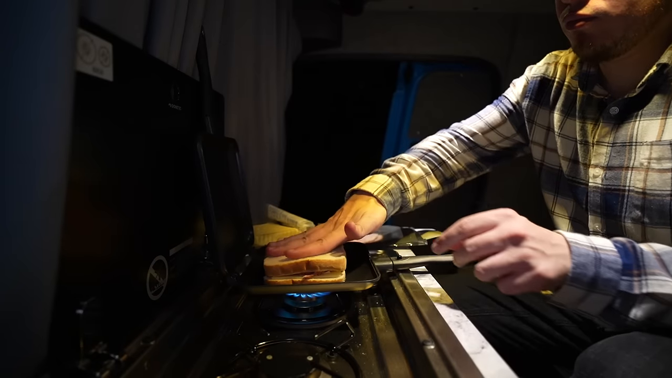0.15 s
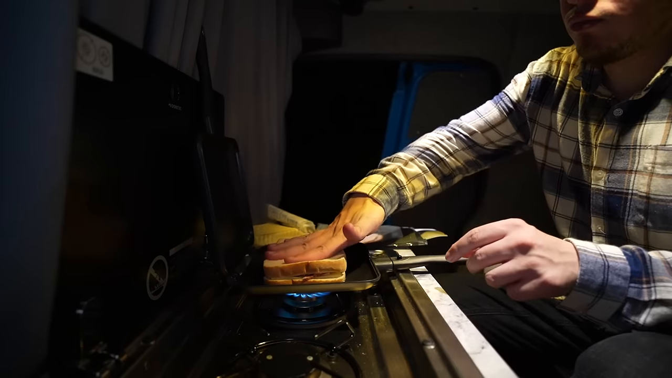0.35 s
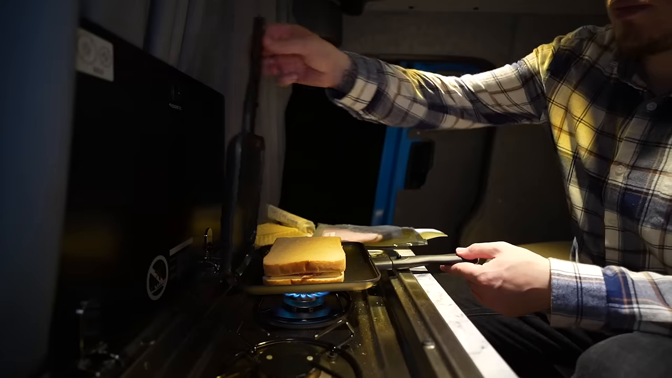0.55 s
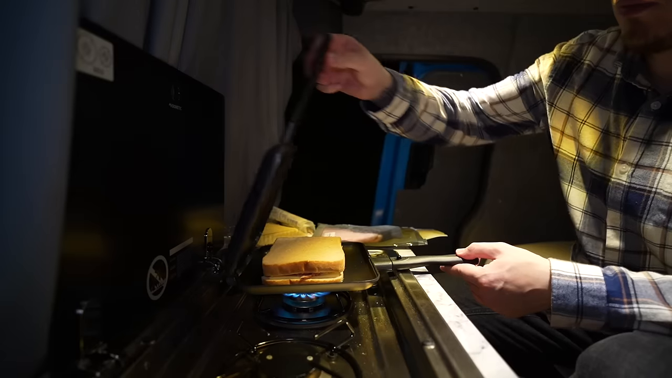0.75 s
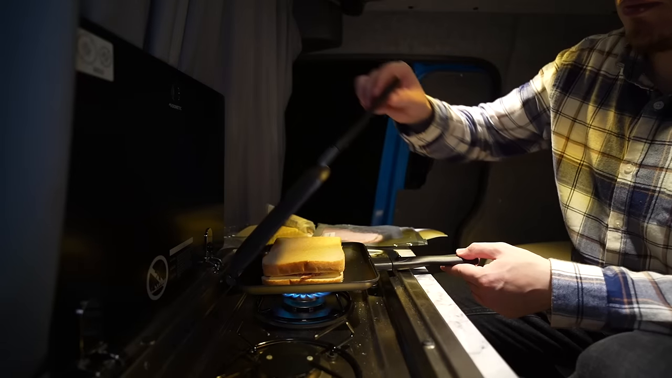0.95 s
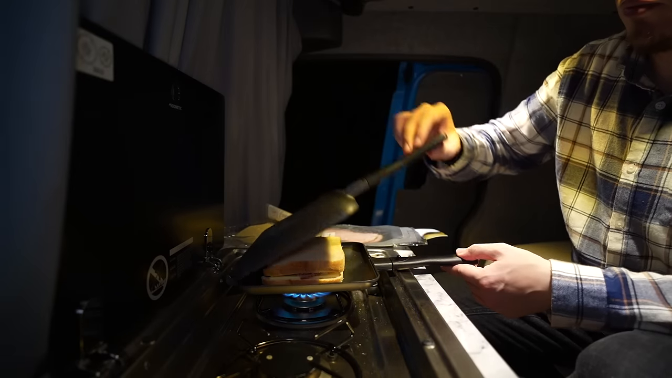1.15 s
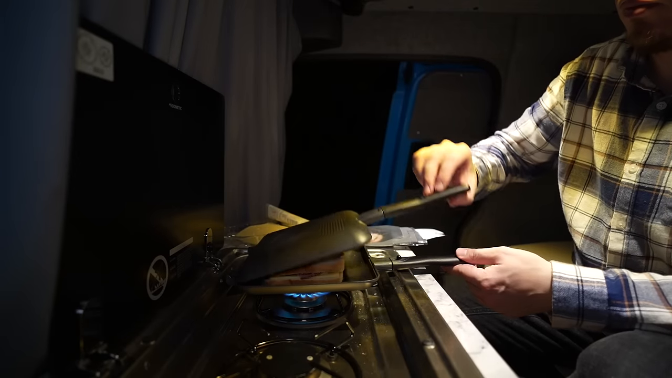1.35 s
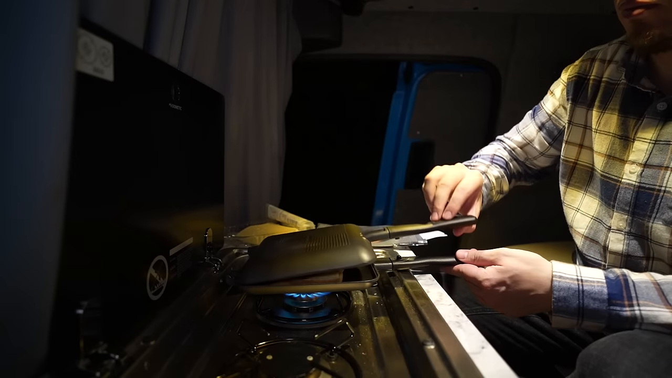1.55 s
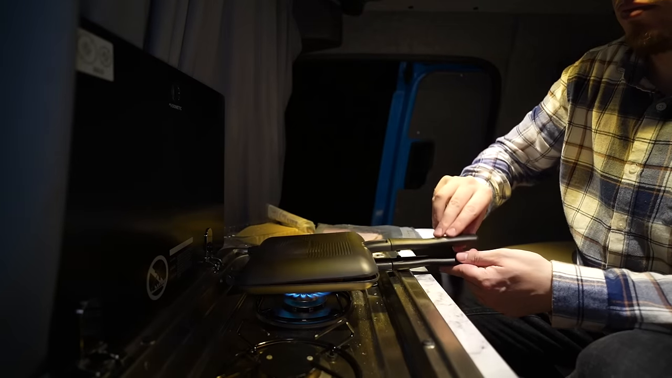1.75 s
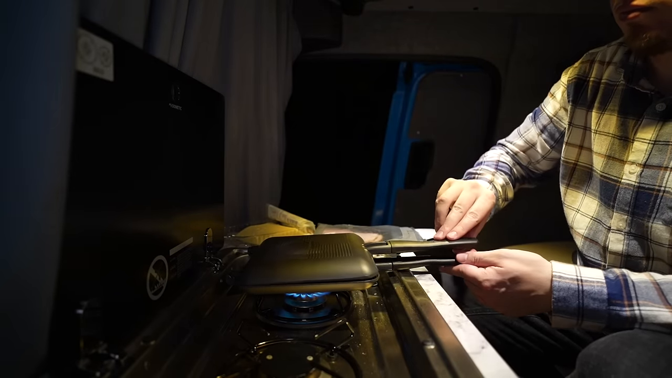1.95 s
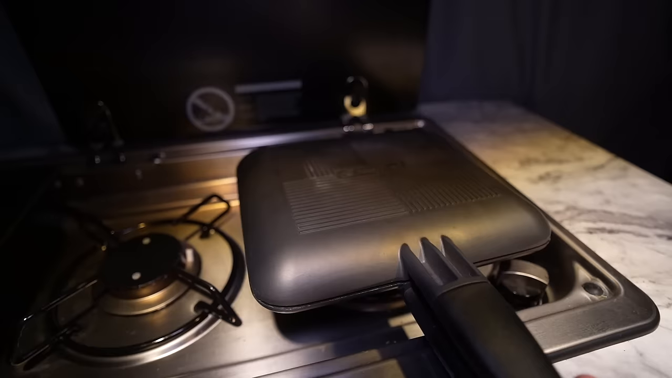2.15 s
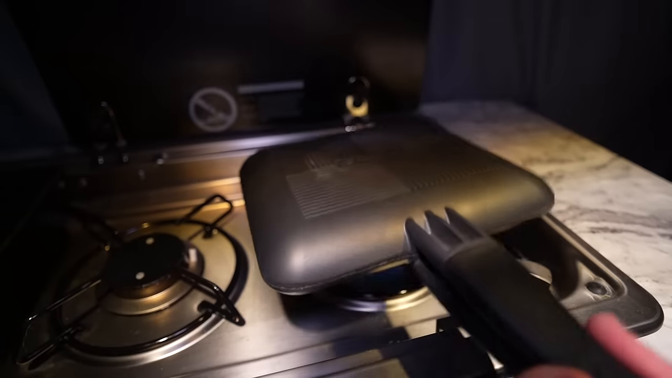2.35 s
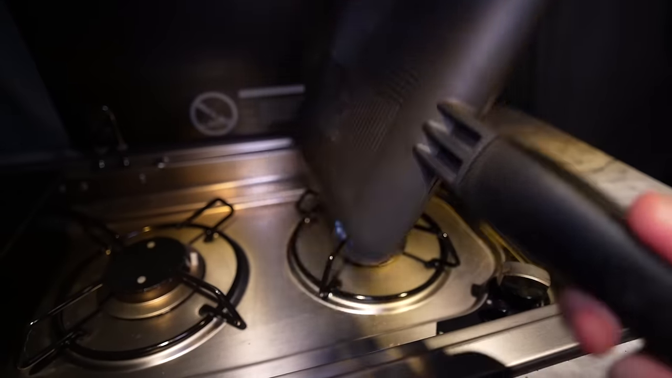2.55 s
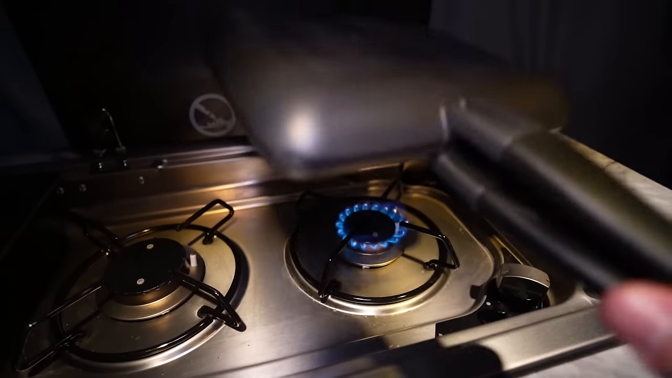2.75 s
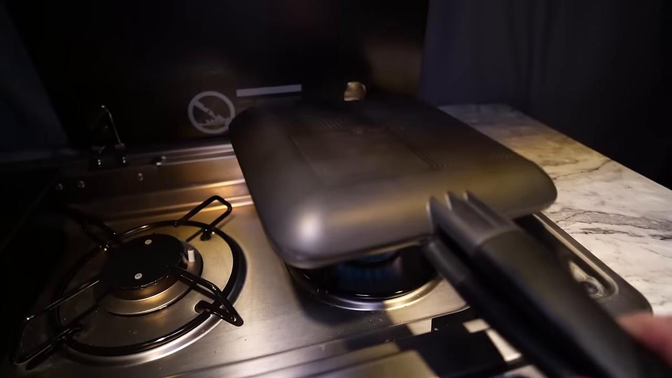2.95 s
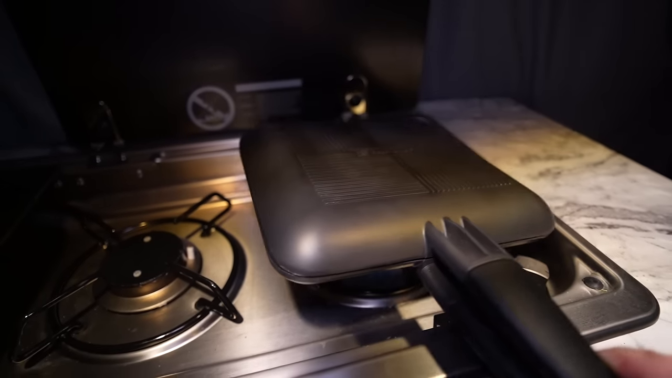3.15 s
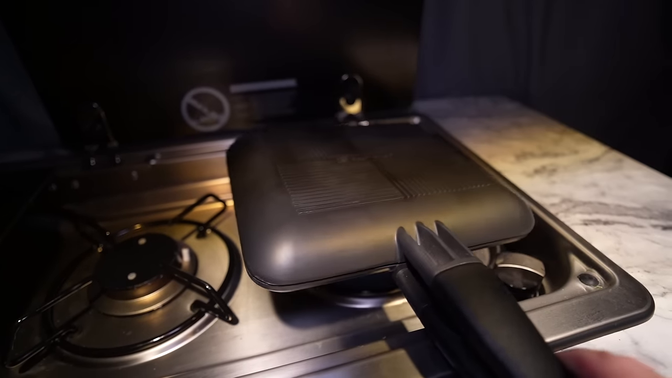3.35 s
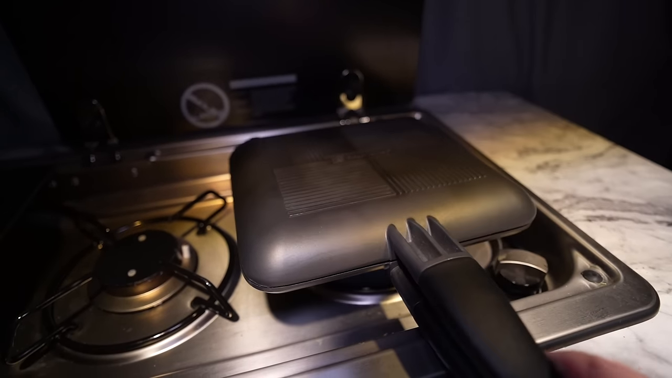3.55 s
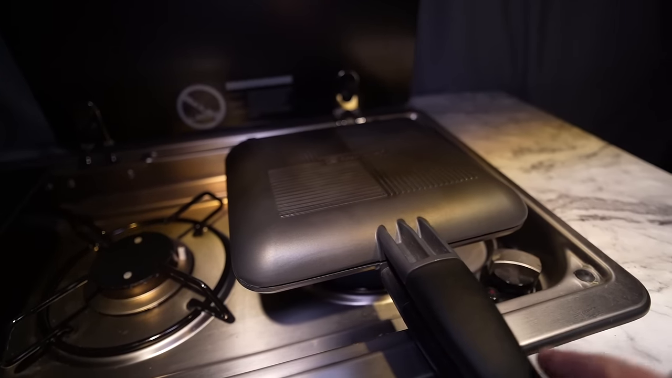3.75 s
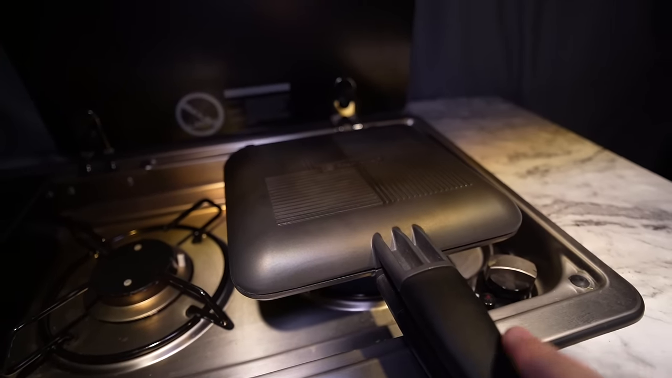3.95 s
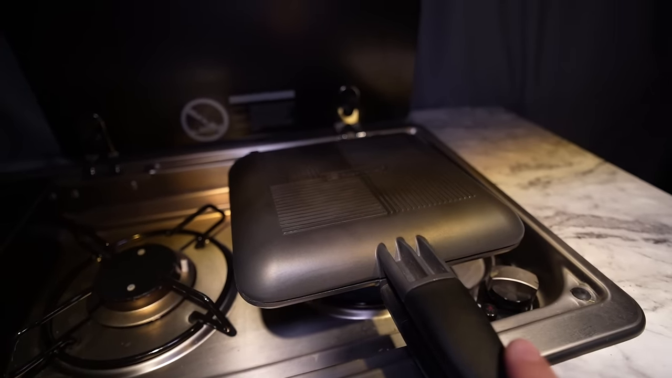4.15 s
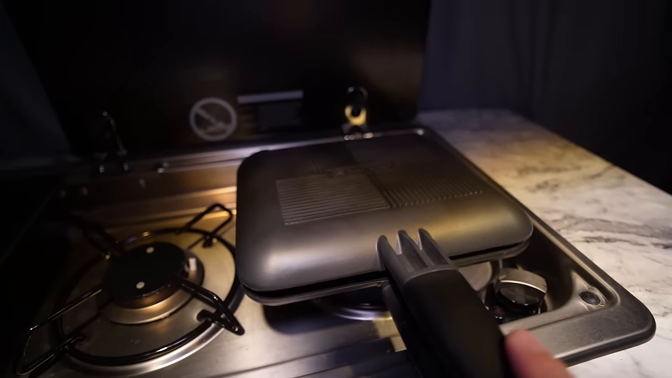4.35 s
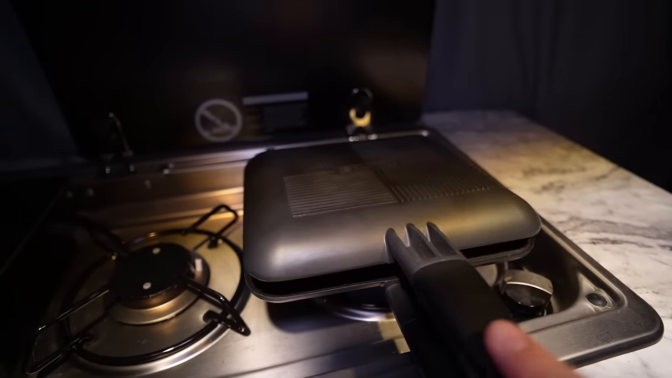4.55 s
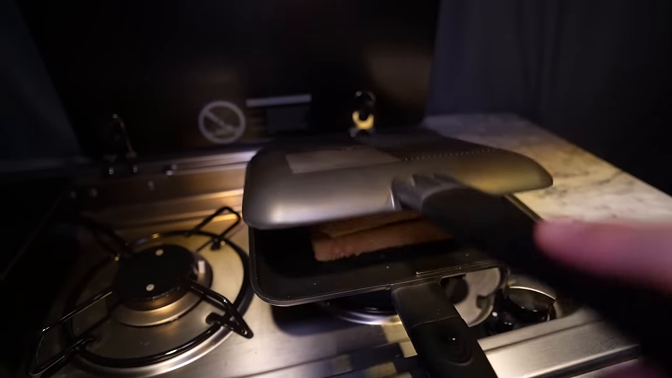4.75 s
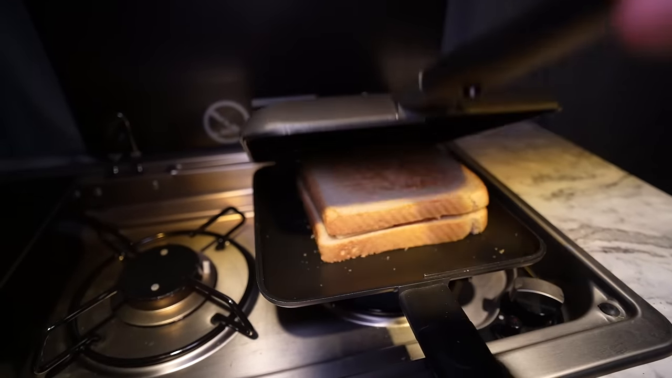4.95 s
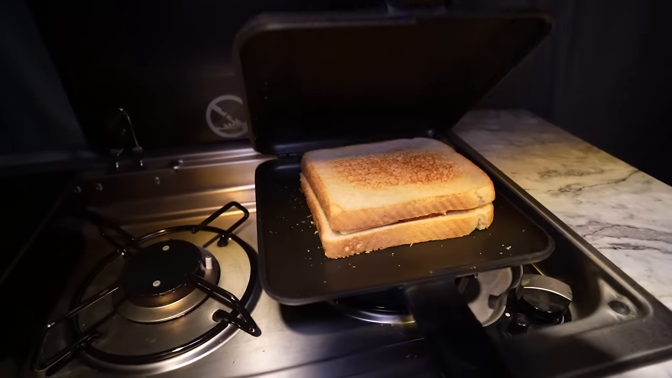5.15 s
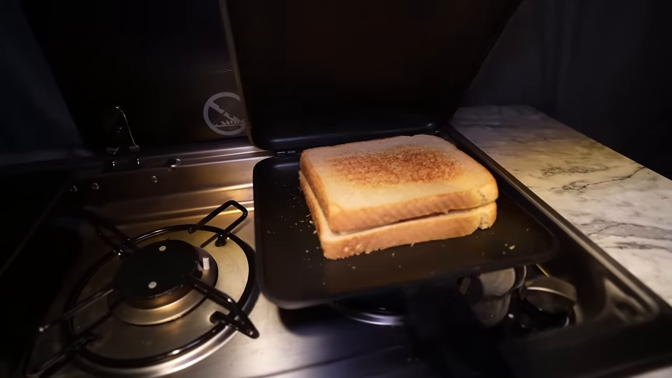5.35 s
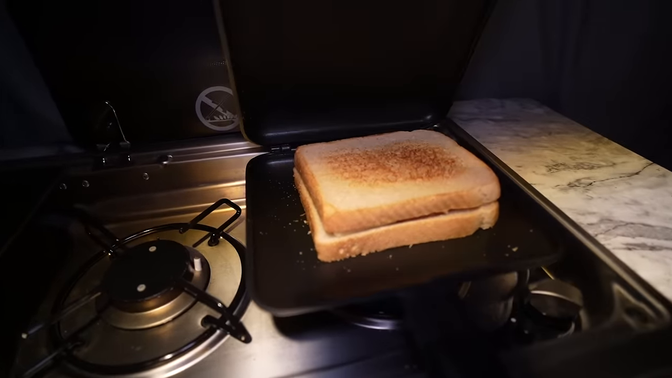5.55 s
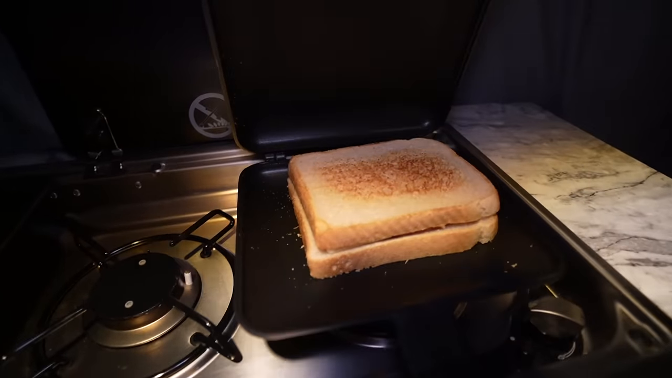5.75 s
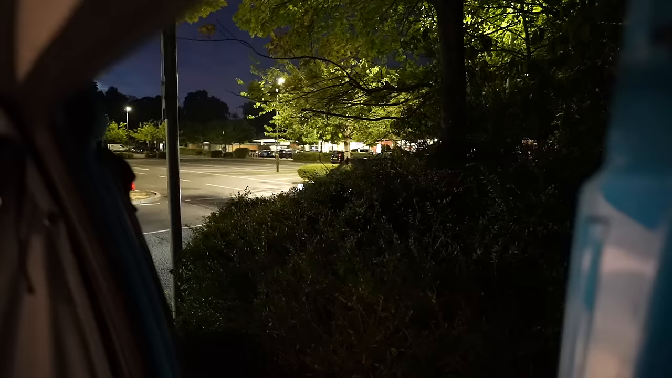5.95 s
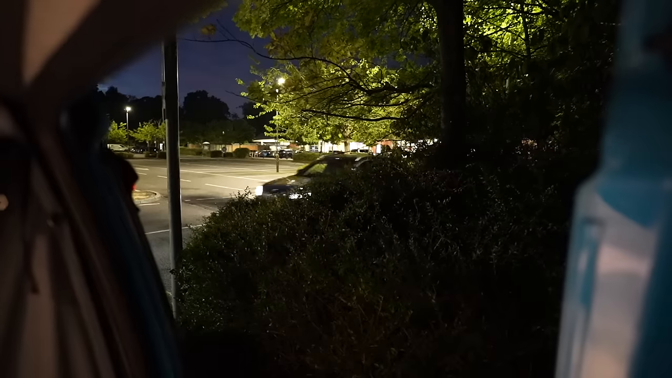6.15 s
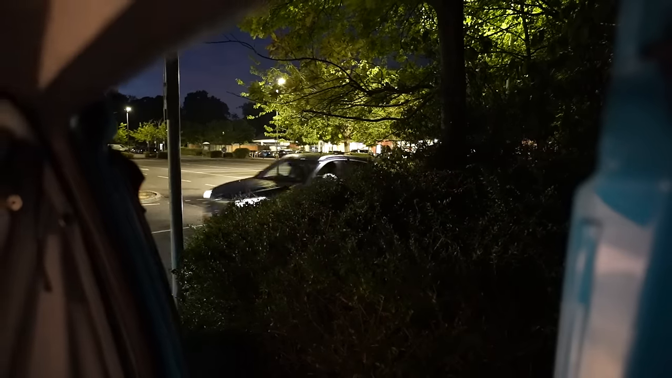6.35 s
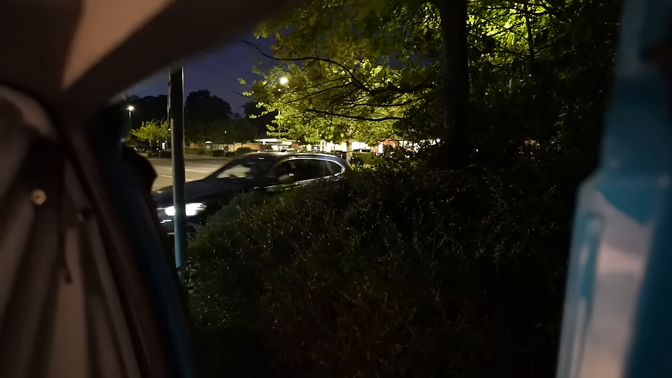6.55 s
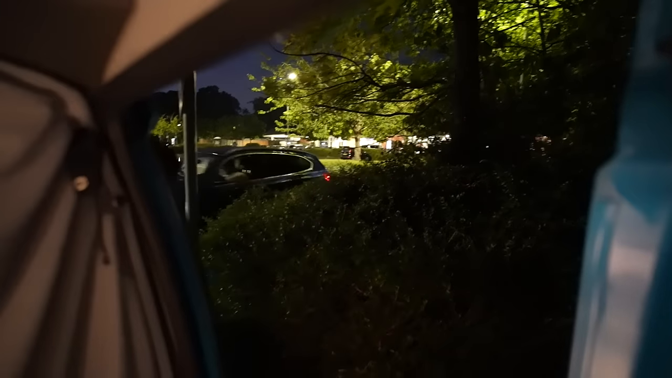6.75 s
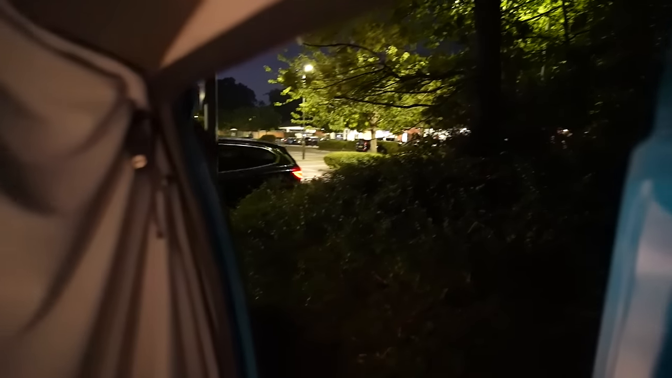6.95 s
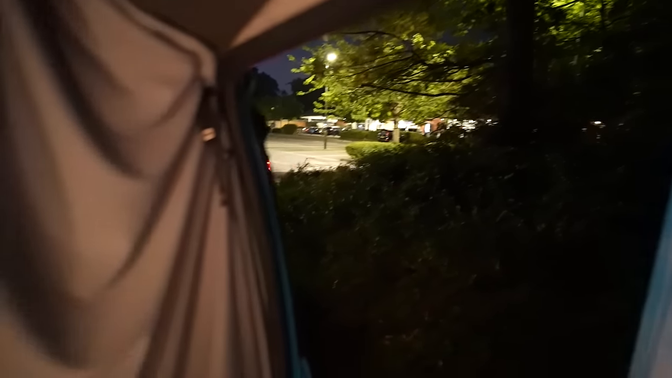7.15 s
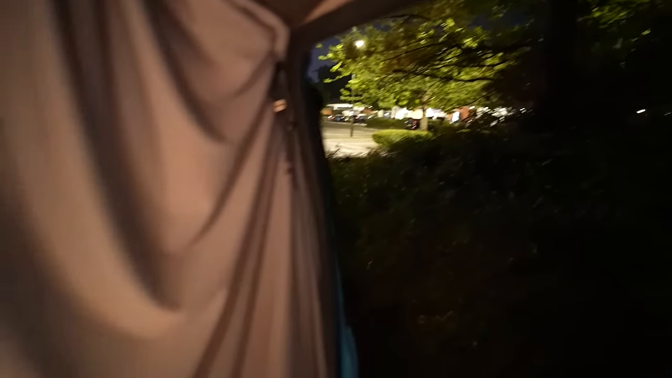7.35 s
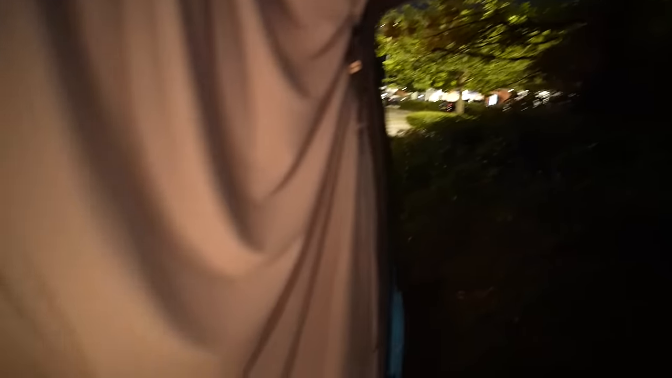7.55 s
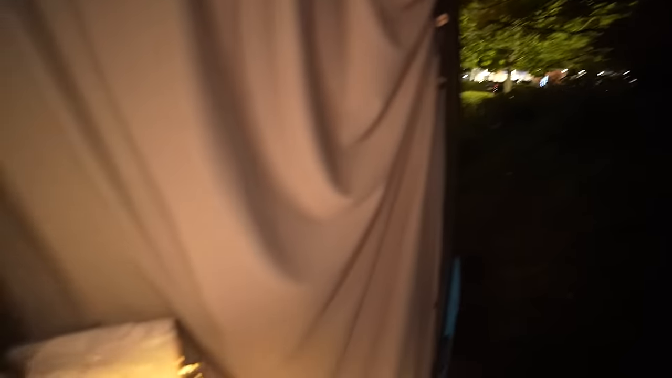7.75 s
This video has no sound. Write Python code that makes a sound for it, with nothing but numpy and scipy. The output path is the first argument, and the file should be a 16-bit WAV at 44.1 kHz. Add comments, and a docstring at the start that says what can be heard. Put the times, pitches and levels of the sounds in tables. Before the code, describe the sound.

Sharp clanks of a sandwich toaster on a gas stove grate, followed by a rumbling sliding door and passing tyres.

```python
"""A gas burner hisses inside a van, heard on a stereo microphone a little way from the stove; at about 2.2 s
the scene changes to close beside it. A cast sandwich toaster knocks, scrapes and clamps shut on the wire grate,
ringing the metal, and the steel hob hums. From about 6 s the scene changes to the open sliding door: the door
rolls and bumps on its track while a car's tyres rush past outside and fade."""
import sys
import numpy as np
from scipy import signal
from scipy.fft import rfft, irfft, next_fast_len
from scipy.io import wavfile
from scipy.ndimage import uniform_filter1d, map_coordinates

SR = 44100
rng = np.random.default_rng(int(sys.argv[2]) if len(sys.argv) > 2 else 0)


def generate_wav(signal):
    """Clip the signal to [-1, 1] and save it as 16-bit WAV at the path in sys.argv[1]."""
    frames = np.transpose(np.atleast_2d(signal))
    scaled = np.clip(frames, -1, 1) * 32767
    pcm = np.round(scaled).astype(np.int16)
    wavfile.write(sys.argv[1], SR, pcm)


N = 348390


def amp(db):
    return 10 ** (np.asarray(db) / 20)


def along(points, hz):
    """Read (Hz, value) points on a log frequency axis."""
    knots_hz, values = np.transpose(points)
    return np.interp(np.log(hz + 1), np.log(knots_hz + 1), values)


def curves(*tables):
    """A gate that is open while a table lasts, then each column as one value per sample."""
    t = np.arange(N) / SR
    gate = sum((t >= rows[0][0]) & (t < rows[-1][0]) for rows in tables)
    times, *columns = np.transpose(np.concatenate(tables))
    return uniform_filter1d(gate * 1., size=300), *[np.interp(t, times, c) for c in columns]


def wobble(rate):
    """A smooth random curve, rate knots a second."""
    return map_coordinates(rng.standard_normal(int(N * rate / SR) + 4), [np.arange(N) * rate / SR])


# The microphone's two sides. Each row: frequency in Hz, correlation of left and right.
STEREO_LIKENESS = [(100, .999), (300, 0.98), (700, 0.88), (1400, .55), (2800, 0.22), (6000, .05)]

def stereo_noise(gain, size=N):
    """Noise of rms 1 shaped by gain(hz); left and right hear the bass alike and the treble apart."""
    padded = next_fast_len(size)
    hz = np.fft.rfftfreq(padded, 1 / SR)
    spread = np.arccos(along(STEREO_LIKENESS, hz)) / 2
    spectra = rfft(rng.standard_normal((2, padded))) * gain(hz)
    mid, side = irfft(spectra * [np.cos(spread), np.sin(spread)], padded)[:, :size]
    pair = np.array([mid + side, mid - side])
    return pair / np.sqrt(np.mean(pair ** 2) + 1e-20)


def noise_band(spectrum, lo_hz=0, hi_hz=SR, unit_hz=(0, SR // 2)):
    """Noise of a spectrum between two soft edges, with rms 1 inside the band unit_hz."""
    gain = lambda hz: amp(along(spectrum, hz)) / (1 + (lo_hz / (hz + 1)) ** 8) / (1 + (hz / hi_hz) ** 8)
    power = gain(np.arange(SR // 2)) ** 2
    return stereo_noise(gain) * np.sqrt(power.sum() / power[slice(*unit_hz)].sum())


# The van's interior around the microphone. Each row: frequency in Hz, seconds to fall 60 dB.
CABIN_DECAY = [(200, 0.41), (2000, 0.22), (8000, 0.14)]

def cabin_echo(sound):
    """Walls and curtains answer with a short echo whose treble dies first."""
    hz, t, spectra = signal.stft(stereo_noise(np.ones_like, size=SR // 3), SR, nperseg=256)
    decay = amp(-60 * t / along(CABIN_DECAY, hz)[:, None])
    _, tail = signal.istft(spectra * decay, SR, nperseg=256)
    return signal.fftconvolve(sound, tail / np.linalg.norm(tail[0]), axes=1)[:, :N]


# The air beyond the open door. Each row: frequency in Hz, relative level in dB.
NIGHT_SPECTRUM = [(5500, -11), (7000, -9.5), (8100, -16.5), (9500, 4), (13000, 2.5), (15800, 4.5),
                  (16800, -19.5)]

def night_air():
    """A faint, thin, steady hiss from outdoors."""
    return amp(-69) * noise_band(NIGHT_SPECTRUM)


# Door and car, heard from the doorway. Each row: frequency in Hz, relative level in dB.
DOORWAY_SPECTRUM = [(40, -15.5), (85, 3.5), (190, 3.5), (270, -4.5), (480, 5.5), (640, -9.5), (820, 0.5),
                    (1400, -9), (2300, -13), (2800, -32.5), (3400, -24.5), (4500, -40), (5900, -40.5),
                    (7200, -50.5), (8000, -70)]
# Each row: time in seconds, then levels in dB of door rumble, rollers, tyre roar and tyre hiss.
DOORWAY_LEVELS = [(5.99, -51, -44.5, -44, -56.5), (6.08, -39, -42, -40, -49), (6.2, -54, -37, -40.5, -51),
                  (6.33, -38, -32.5, -39, -47), (6.5, -43.5, -35.5, -41.5, -51), (6.68, -39, -33, -39, -55),
                  (6.78, -29, -33.5, -39.5, -52.5), (6.92, -41, -36, -40.5, -56),
                  (7.1, -41.5, -35, -51, -55), (7.33, -44, -40, -52.5, -60.5),
                  (7.42, -43.5, -44.5, -58, -61.5), (7.7, -45.5, -47.5, -63, -60.5),
                  (7.76, -50, -54, -59.5, -64), (7.9, -46.5, -57.5, -61, -63.5)]

def passing_car():
    """Tyres roar and hiss out in the car park, then fade."""
    *_, roar_db, hiss_db = curves(DOORWAY_LEVELS)
    roar = noise_band(DOORWAY_SPECTRUM, lo_hz=1200, hi_hz=2800, unit_hz=(1300, 2600))
    hiss = noise_band(DOORWAY_SPECTRUM, lo_hz=2800, unit_hz=(3000, 7000))
    return amp(roar_db + .8 * wobble(30)) * roar + amp(hiss_db + .8 * wobble(30)) * hiss


def sliding_door():
    """Beside the microphone the door panel rumbles and its rollers jolt along the track."""
    _, rumble_db, roller_db, *_ = curves(DOORWAY_LEVELS)
    rumble = noise_band(DOORWAY_SPECTRUM, hi_hz=288, unit_hz=(60, 250))
    rollers = noise_band(DOORWAY_SPECTRUM, lo_hz=270, hi_hz=1200, unit_hz=(300, 1100))
    return amp(rumble_db + .67 * wobble(13)) * rumble + amp(roller_db + 1.3 * wobble(40)) * rollers


# Joints in the door's track. Each row: start in seconds, level in dB, seconds to fall 60 dB.
TRACK_JOINTS = [(6.288, -24.5, 0.02), (6.31, -27.5, 0.016), (6.325, -28.5, 0.016), (6.742, -17, 0.027)]
# The rail's ring. Each row: frequency in Hz, relative level in dB.
RAIL_MODES = [(480, 2.5), (1550, 4), (1700, 3.5), (2000, -0.5), (2250, -1.5), (2500, -10), (3300, -18),
              (4200, -30)]

def track_bumps():
    """A roller crosses a joint and knocks the rail, which rings briefly."""
    out, t = np.zeros((2, N)), np.arange(SR // 8) / SR
    for start, db, t60 in TRACK_JOINTS:
        envelope = amp(db - 60 * t / t60) * (1 - np.exp(-t / .0011))
        for hz, mode_db in RAIL_MODES:
            gain = amp(mode_db + rng.normal(0, .99, (2, 1)))
            ring = np.sin(2 * np.pi * hz * t + rng.normal(0, .32, (2, 1)))
            out[:, round(start * SR):][:, :len(t)] += envelope * gain * ring
    return out


# When the scene changes, in seconds: to close by the stove, then to the open door.
SCENE_CHANGES_S = [2.17, 5.995]
# The flame from a little way off, and from close by. Each row: frequency in Hz, relative level in dB.
FAR_FLAME_SPECTRUM = [(25, -24), (74, -10.5), (150, -10.5), (280, -14), (620, -20.5), (1100, -29.5),
                      (1400, -35), (1650, -22), (2300, -16), (2750, -45.5), (3800, -50), (5000, -37),
                      (6500, -55), (9500, -42.5), (12500, -43), (13600, -29.5), (15600, -24.5),
                      (16000, -56.5)]
NEAR_FLAME_SPECTRUM = [(25, -7.5), (92, 0.5), (378, -16.5), (880, -13), (1400, -18.5), (1800, -14.5),
                       (2500, -27), (3320, -36.5), (8500, -47), (11500, -44), (12300, -31), (13200, -43.5),
                       (14400, -38), (15000, -40.5), (15600, -34), (16000, -60.5)]
# One list per distance. Each row: time in seconds, then levels in dB of roar, jet and flutter.
FLAME_LEVELS = [
    [(0, -52, -53.5, -61), (.45, -49.5, -50.5, -56), (.9, -49, -52, -54.5), (2.05, -52, -56.5, -58.5),
     (2.17, -47, -54.5, -46)],
    [(2.17, -48, -63, -51), (2.9, -55.5, -66, -63), (3.3, -52.5, -70, -55.5), (3.85, -59.5, -71.5, -60.5),
     (4.3, -56, -70.5, -62), (4.8, -65.5, -73.5, -66), (6, -61.5, -74, -64.5)],
]

def burner():
    """The gas ring: a low flutter, a roar in the burner's mouth and a thin jet hiss."""
    gate, roar_db, jet_db, flutter_db = curves(*FLAME_LEVELS)
    far = uniform_filter1d(1. * (np.arange(N) < SCENE_CHANGES_S[0] * SR), size=300)

    def flame(**band):
        distant = noise_band(FAR_FLAME_SPECTRUM, **band)
        close = noise_band(NEAR_FLAME_SPECTRUM, **band)
        return far * distant + (1 - far) * close

    flutter = amp(flutter_db + 1.5 * wobble(12)) * flame(hi_hz=1200, unit_hz=(250, 900))
    roar = amp(roar_db + .7 * wobble(8)) * flame(lo_hz=1200, hi_hz=8000, unit_hz=(1500, 2500))
    jet = amp(jet_db + .7 * wobble(8)) * flame(lo_hz=8000, unit_hz=(12000, 16000))
    return gate * (flutter + roar + jet)


# The hob under the grate, one list per hum. Each row: time in seconds, pitch in Hz, relative level in dB.
HOB_HUMS = [
    [(.45, 158.7, -43), (.6, 160.2, -52), (.64, 105.2, -27), (.78, 101.9, -37), (.85, 160.8, -53),
     (1.08, 157.8, -52)],
    [(1.1, 157.8, -43), (1.2, 160.5, -51.5), (1.45, 118.4, -61), (1.56, 116.2, -53), (1.6, 155.2, -42.5),
     (1.92, 154.6, -44), (1.95, 125.4, -43), (2.04, 125, -61)],
    [(2.88, 90, -48), (2.98, 92.1, -42), (3.06, 90, -51)],
    [(3.5, 109.1, -35), (3.62, 110.7, -41.5), (3.72, 119, -31), (3.8, 119.7, -56)],
    [(4.34, 104.2, -25), (4.42, 104, -37), (4.52, 112.8, -28.5), (4.61, 119.5, -42)],
]

def hob_hum():
    """The hob's steel sheet trembles at a low, slightly rough pitch."""
    gate, hz, db = curves(*HOB_HUMS)
    level = uniform_filter1d(gate, size=900) * amp(db + 2 + 2.5 * wobble(25))
    phase = 2 * np.pi * np.cumsum(hz + 2.5 * wobble(30)) / SR
    return level * np.sin(phase)


# Toaster pan, hob and grate. Each row: frequency in Hz, relative level in dB, seconds to fall 60 dB.
METAL_MODES = [(105, -3, .3), (150, -6, .2), (255, -5, .1), (330, -8, .1), (398, -3, .11), (470, -3, .11),
               (575, -2, .11), (640, -7, .08), (780, -5, .08), (910, -3, .1), (1044, -6, .08),
               (1240, -6, .07), (1545, -7, .075), (1700, -9, .06), (1905, -4, .08), (2180, -9, .06),
               (2505, -9, .07), (2643, -7, .07), (2920, -8, .065), (3200, -9, .06), (3810, -10, .05),
               (4317, -8, .06), (5739, -11, .04), (6230, -9, .04)]

def metal_ring(strike_spectrum, t):
    """Struck metal rings in decaying modes, at new strengths with every blow."""
    modes_hz, mode_db, t60 = np.transpose(METAL_MODES)
    count = len(modes_hz)
    hz = modes_hz * (1 + rng.normal(0, .012, count))  # grip and support shift the pitches
    gains = amp(along(strike_spectrum, hz) + mode_db + rng.normal(0, 3.5, count))
    spread = np.arccos(along(STEREO_LIKENESS, modes_hz))  # phase between left and right
    phase = rng.uniform(0, 2.3, count) + [[.5], [-.5]] * spread * rng.choice([-1, 1], count)
    knots_db = rng.normal(0, 3, (count, 40))  # loose parts make each ring flutter
    flutter_db = np.array([np.interp(t, np.linspace(0, t[-1], len(row)), row) for row in knots_db])
    envelopes = gains[:, None] * amp(flutter_db - 60 * t / t60[:, None])
    return np.sum(envelopes * np.sin(2 * np.pi * hz[:, None] * t + phase[:, :, None]), axis=1)


def pan_response(hz):
    """The pan's gain when rubbed: eight low resonances of alternating sign."""
    return np.abs(sum((-1) ** k * amp(db) * 60 * hz / (mode_hz ** 2 - hz ** 2 + 60j * hz)
                      for k, (mode_hz, db, _) in enumerate(METAL_MODES[3:11])))


# The toaster slides on the grate. Each row: start and end in seconds, rise and fall in seconds
# per 30 dB, then levels in dB of pan, grind and hiss.
TOASTER_SCRAPES = [(0.463, 0.472, .02, 0.0088, -41.5, -53.5, -74.5),
                   (0.618, 0.637, 0.037, 0.18, -34.5, -44, -59.5),
                   (1.437, 1.47, .01, 0.057, -47.5, -61, -83), (2.2, 2.335, .02, 0.022, -48, -66, -84.5),
                   (2.378, 2.43, .02, 0.18, -42, -47, -65), (2.562, 2.64, 0.05, 0.09, -37, -28.5, -37),
                   (2.683, 2.665, 0.005, 0.015, -33, -35, -55.5),
                   (3.103, 3.177, 0.0201, .03, -52, -60.5, -74),
                   (3.451, 3.469, .006, 0.046, -31.5, -44.5, -58.5),
                   (3.493, 3.53, 0.011, .02, -23.5, -45.5, -71.5),
                   (3.528, 3.593, .004, 0.036, -19, -19.5, -35),
                   (4.326, 4.351, .003, 0.026, -15.5, -21, -33),
                   (4.351, 4.408, 0.014, .03, -20.5, -29, -58),
                   (4.431, 4.457, .003, .05, -14.5, -14.5, -28)]
# The grind and hiss of the contact. Each row: frequency in Hz, relative level in dB.
GRIND_SPECTRUM = [(600, -32.5), (1300, 9.5), (2500, 5.5), (4500, 0), (6800, -7.5), (7900, -42),
                  (8600, -52.5)]
HISS_SPECTRUM = [(7000, -35), (9000, 3), (11500, 3.5), (15500, -3.5), (16800, -19.5)]

def toaster_scrapes():
    """Metal sliding on metal shakes the pan's low modes, grinds in gritty jolts and hisses."""
    t, levels = np.arange(N) / SR, np.zeros((3, N))
    for start, end, rise, fall, *db in TOASTER_SCRAPES:
        shape_db = np.interp(t, [start - 3 * rise, start, end, end + 3 * fall], [-90, 0, 0, -90])
        levels += amp(db)[:, None] * amp(shape_db)
    pan, grind, hiss = levels
    grit = amp(1.5 * wobble(200))
    shake = amp(3 * wobble(60))
    body = pan * shake * stereo_noise(pan_response)
    return body + grit * (grind * noise_band(GRIND_SPECTRUM) + hiss * noise_band(HISS_SPECTRUM))


# A knock has five zones, low to high: hob thud, pan, grate, edge, sparkle. Their corners in Hz:
ZONE_CORNERS_HZ = [150, 330, 620, 1600, 3000, 4600, 6500, 11000]
# The zone, 0 to 4, that each corner belongs to.
CORNER_ZONE = np.array([0, 1, 1, 2, 2, 3, 3, 4])
# The unpitched part of each zone. Each row: relative level in dB, seconds to fall 60 dB.
ZONE_CLATTER = [(-4, 0.2), (-8, 0.02), (-4, 0.069), (-4.5, .055), (-1, .035)]
# The toaster knocks and clamps shut on the stove. Each row: start in seconds, pan level in dB,
# then hob thud, grate and edge in dB relative to the pan.
TOASTER_KNOCKS = [(0.479, -14.5, -14, 2, -31.5), (0.614, -28, 6, 0, -26), (0.642, -9, -6.5, -13, -24.5),
                  (0.724, -17.5, -2.5, -13, -61), (1.01, -22, -30, -50, -57), (1.096, -8, -11, -0.5, -11.5),
                  (1.156, -23.5, -1.5, -40, -24), (1.457, -6.5, -8, -42, -63),
                  (1.938, -33.5, 6, -11.5, -46), (2.065, -3, -13, -33, -22), (2.072, -1, -26, -14, -55.5),
                  (2.173, -19, -8, -18, -41), (2.33, -4.5, -38, -12, -21.5), (2.357, -19, -26.5, -33, -46),
                  (2.387, -16.5, -18.5, -22.5, -32.5), (2.625, -3, -41, -12.5, -7.5),
                  (2.68, -5, -50.5, -0.5, -3.5), (2.752, -11.5, -44.5, 7, 3.5),
                  (2.761, -13, -36.5, -5, -11.5), (2.875, -31, -14, -32, -18),
                  (3.064, -30.5, -8, -24, -35.5), (3.229, -33, -20.5, -21, -25),
                  (3.334, -4.5, -23, -3, -10), (3.372, -12, -6.5, -1.5, -24),
                  (3.439, -15, -23.5, -20.5, -35), (3.46, -19, -32.5, -31, -34.5),
                  (3.489, -18.5, -0.5, -20.5, -36.5), (3.533, -4, -15.5, -11.5, -7.5),
                  (3.584, -5.5, -35.5, -10.5, -5), (4.07, -14.5, -17.5, -42.5, -52.5),
                  (4.116, -34, -18, -48, -59), (4.224, -29, -29.5, -39.5, -47.5),
                  (4.329, -8.5, -30.5, 0.5, -18), (4.41, -7, -20.5, 1.5, -12.5),
                  (4.436, -12.5, -1.5, -1.5, 2), (4.655, -12, -57, -10, -42.5),
                  (4.669, -14.5, -46, -8.5, -25.5)]

def toaster_knocks():
    """Each blow rings the metal and scatters a short, noisy clatter."""
    out, t = np.zeros((2, N + SR)), np.arange(SR // 4) / SR
    for start, pan_db, thud_db, grate_db, edge_db in TOASTER_KNOCKS:
        zone_db = pan_db + np.array([thud_db, 0, grate_db, edge_db, edge_db - 22])
        knock = metal_ring(np.transpose([ZONE_CORNERS_HZ, zone_db[CORNER_ZONE]]), t)
        for zone, (clatter_db, t60) in enumerate(ZONE_CLATTER):
            window = np.transpose([ZONE_CORNERS_HZ, CORNER_ZONE == zone])
            gain = lambda hz: along(window, hz) ** 2 / (1 + (90 / (hz + 1)) ** 6)  # 90 Hz low cut
            knock += amp(zone_db[zone] + clatter_db - 60 * t / t60) * stereo_noise(gain, size=len(t))
        rise_s = .00043 * amp(-edge_db / 3)  # duller contacts are softer and start more slowly
        out[:, round(start * SR):][:, :len(t)] += knock * (1 - np.exp(-t / rise_s))
    return amp(-8.5) * out[:, :N]


def scene():
    """First at the stove, where the cabin echoes the metal; then the scene changes to the open door."""
    toaster = toaster_knocks() + toaster_scrapes()
    stove = toaster + amp(-15) * cabin_echo(toaster) + hob_hum() + burner()
    at_door = np.arange(N) > SCENE_CHANGES_S[1] * SR
    return stove + at_door * (sliding_door() + passing_car() + night_air()) + track_bumps()


def record(dry):
    """Peaks are softly squeezed and the highest treble is cut off."""
    ceiling, top_hz = .85, 16500
    squeezed = dry / (1 + np.abs(dry / ceiling) ** 4) ** (1 / 4)
    return irfft(rfft(squeezed) * (np.fft.rfftfreq(N, 1 / SR) < top_hz), N)


dry = scene()
out = record(dry)
generate_wav(out)
```